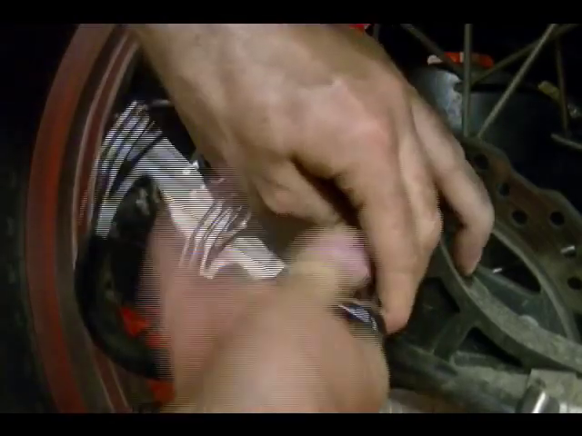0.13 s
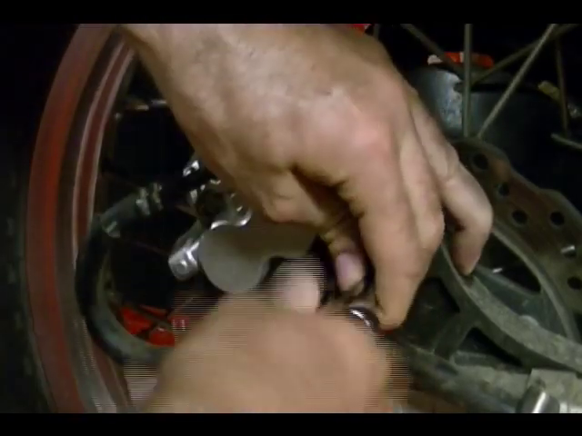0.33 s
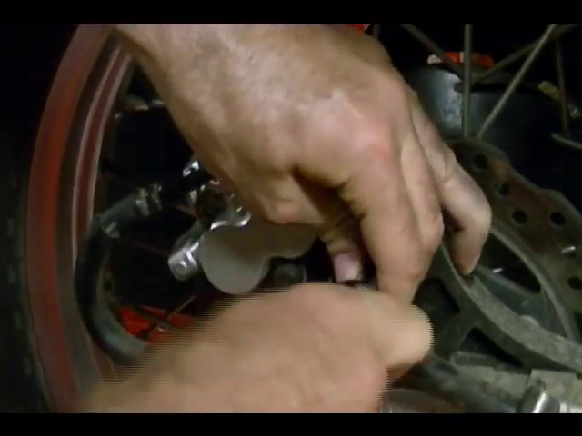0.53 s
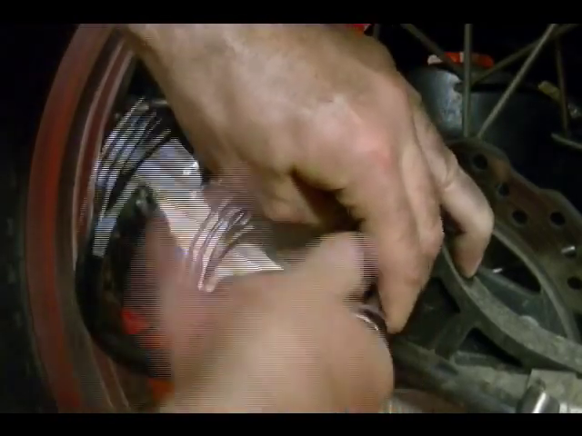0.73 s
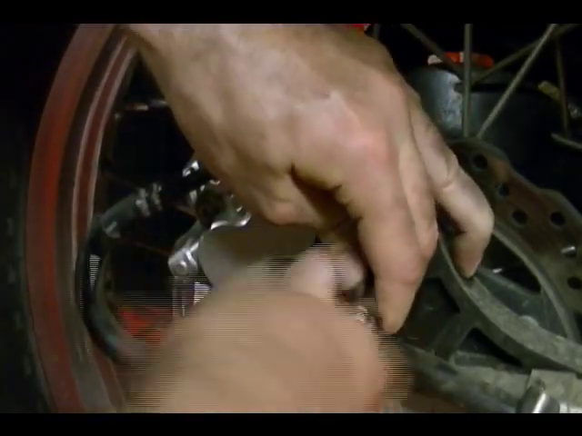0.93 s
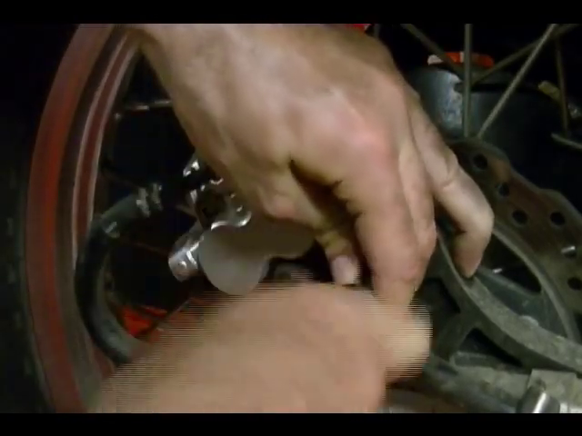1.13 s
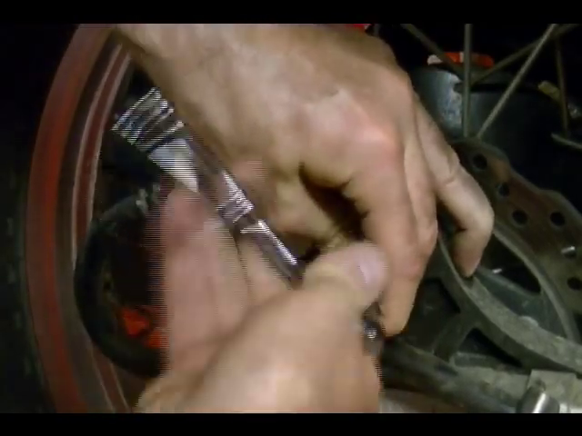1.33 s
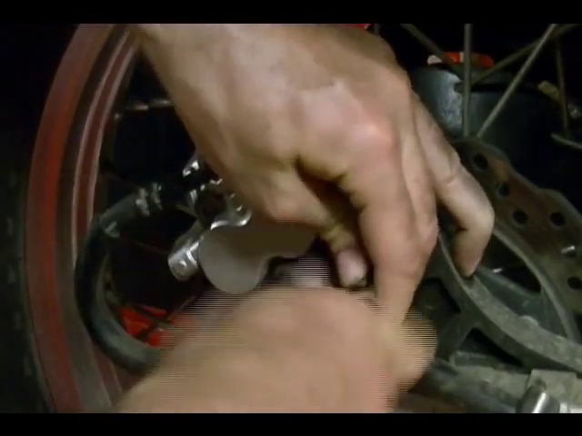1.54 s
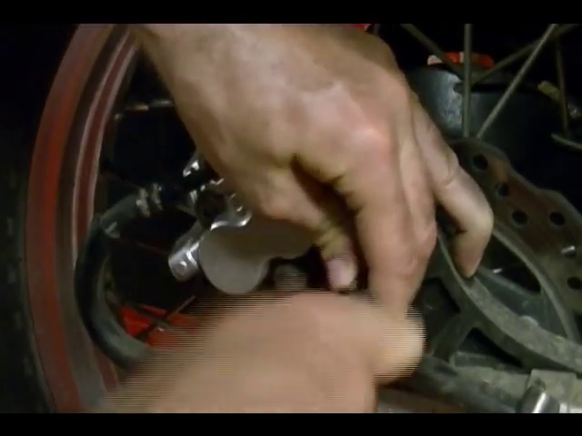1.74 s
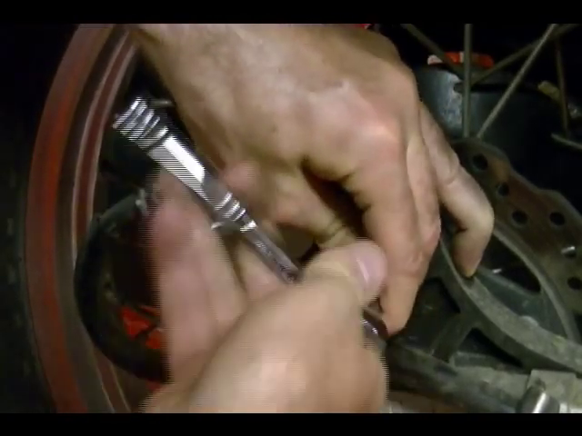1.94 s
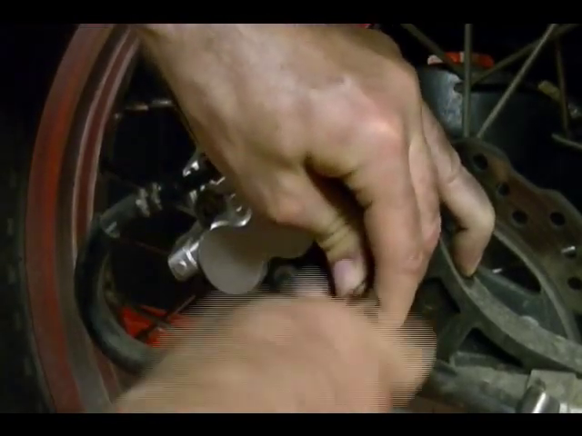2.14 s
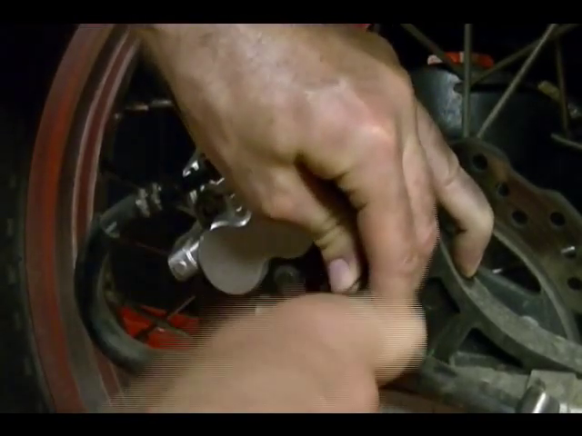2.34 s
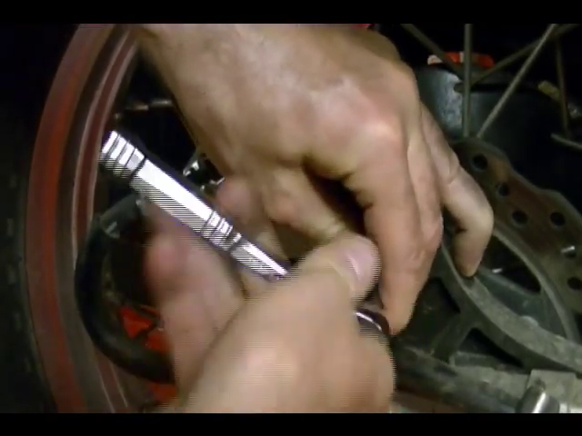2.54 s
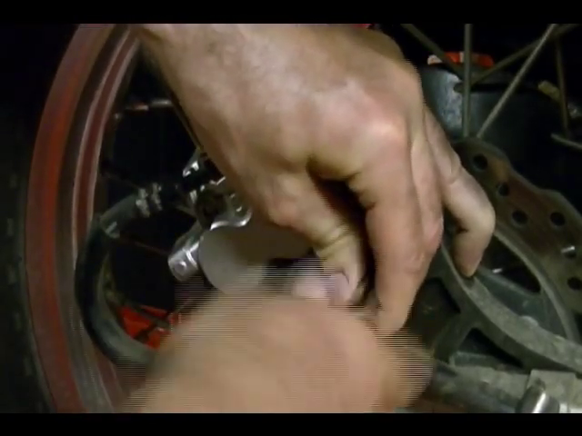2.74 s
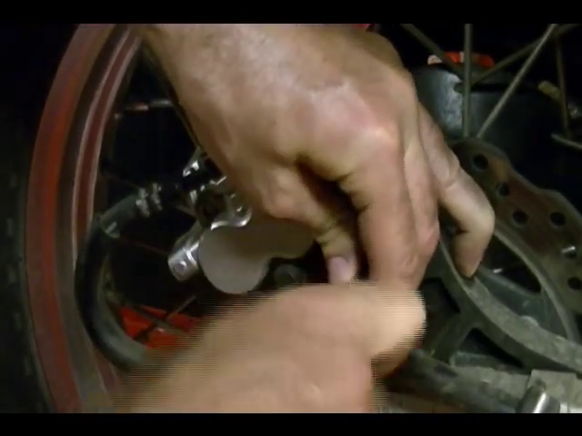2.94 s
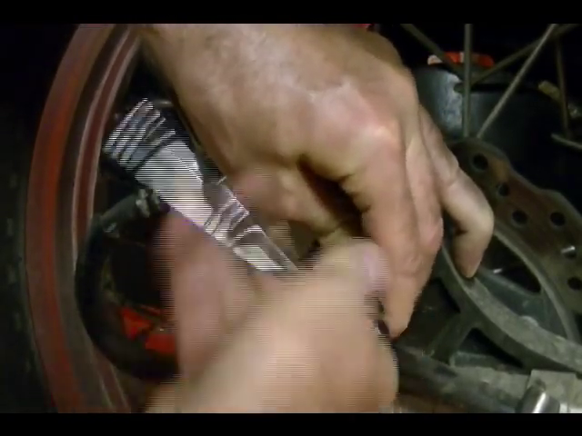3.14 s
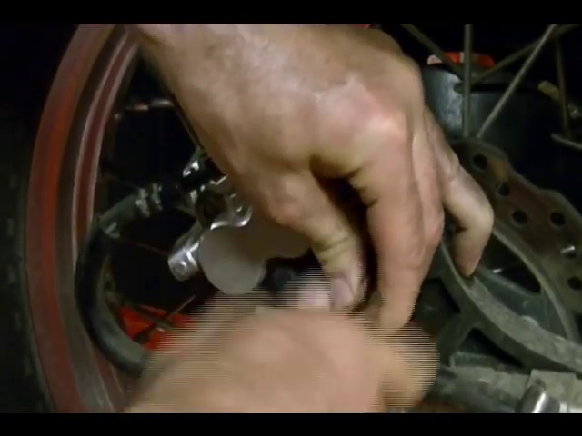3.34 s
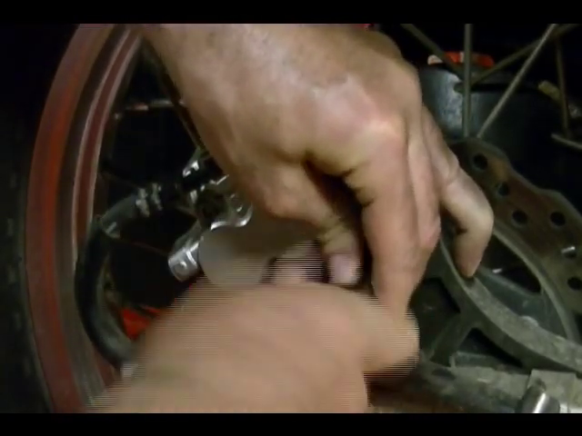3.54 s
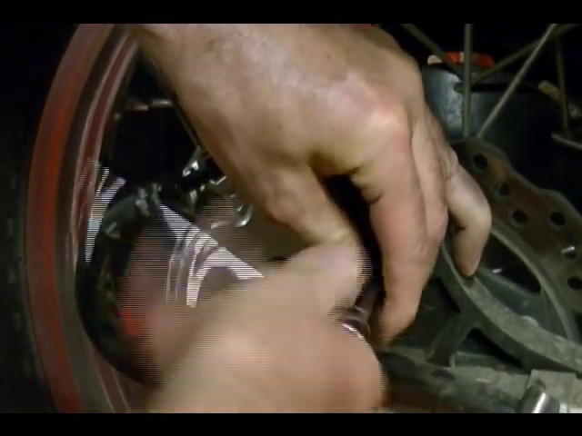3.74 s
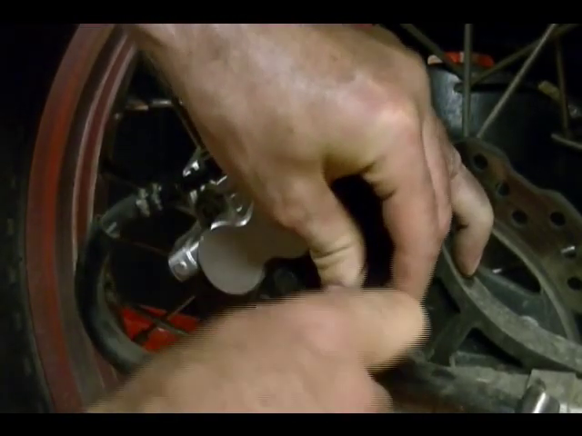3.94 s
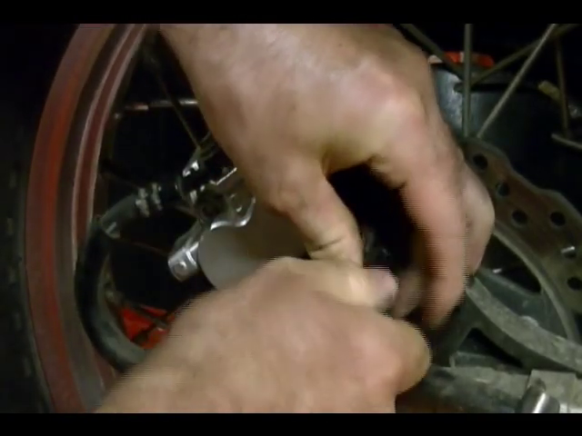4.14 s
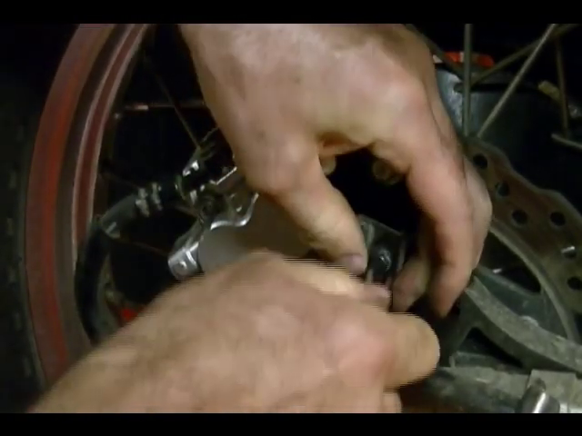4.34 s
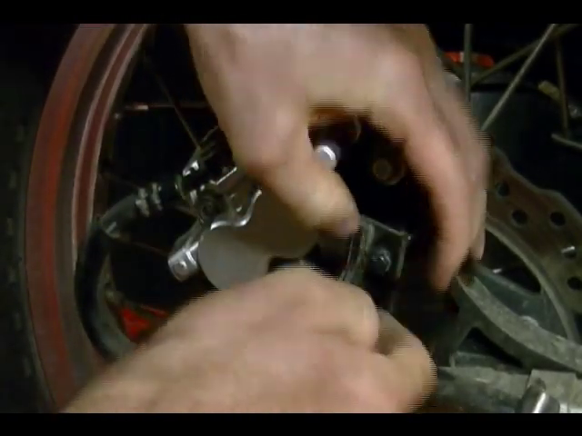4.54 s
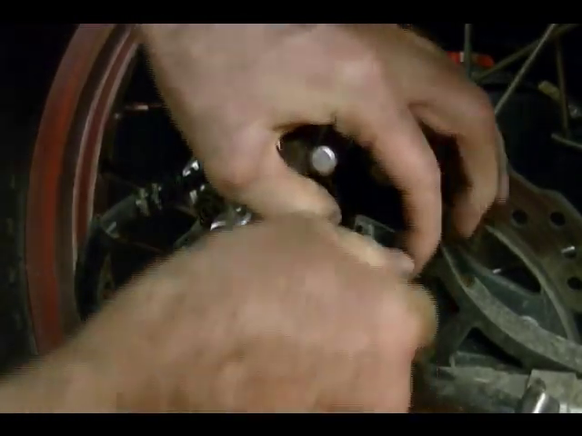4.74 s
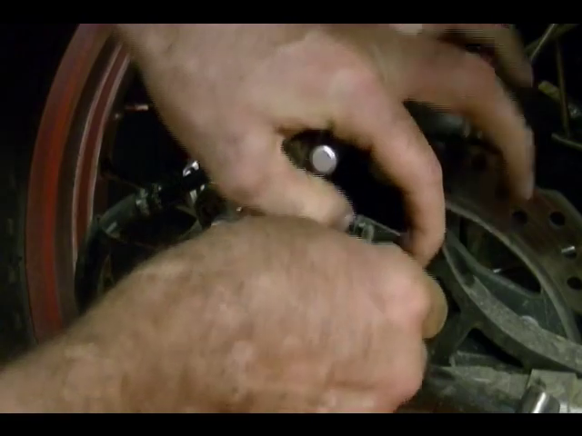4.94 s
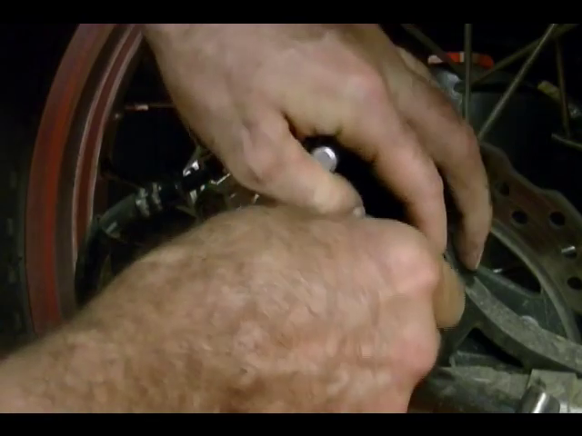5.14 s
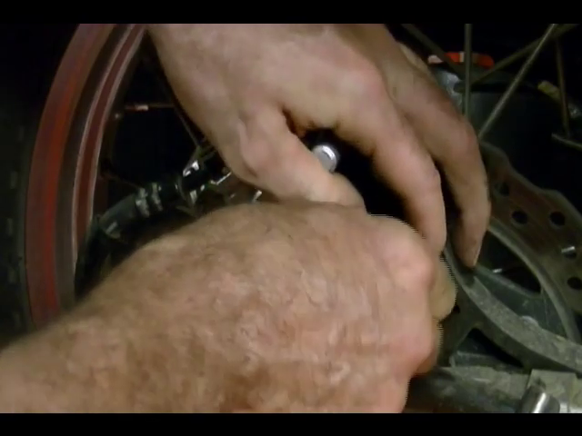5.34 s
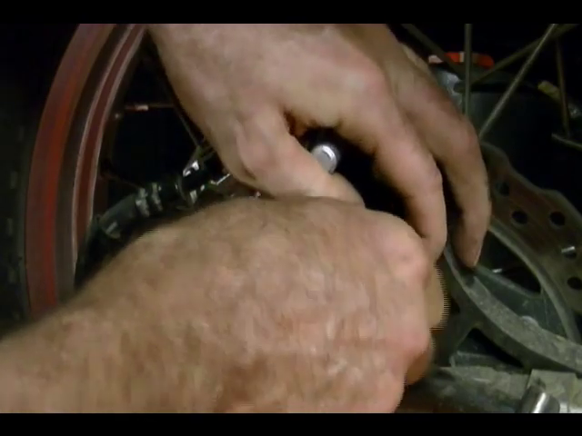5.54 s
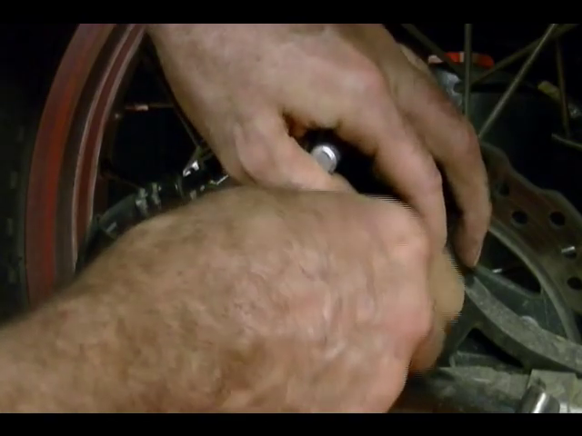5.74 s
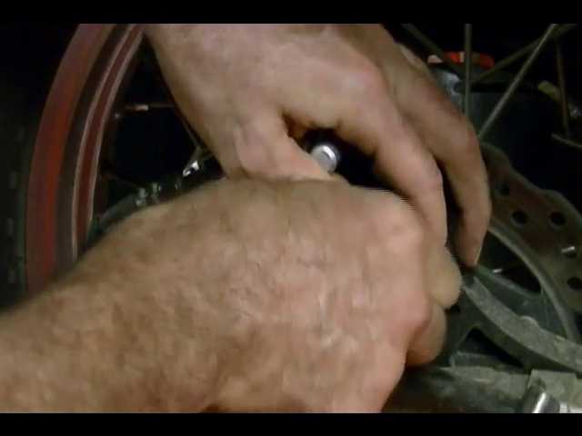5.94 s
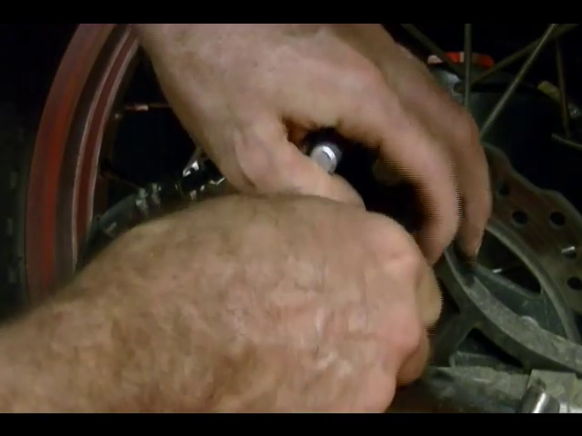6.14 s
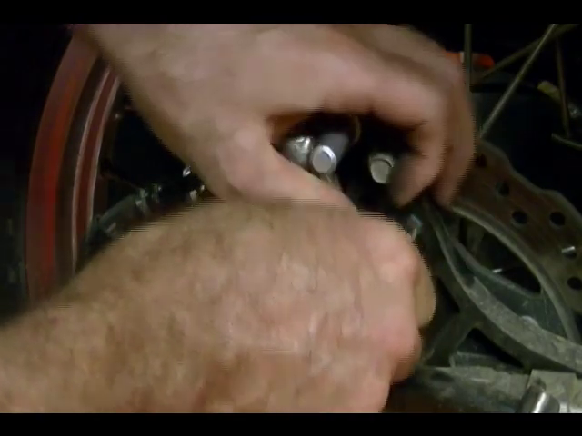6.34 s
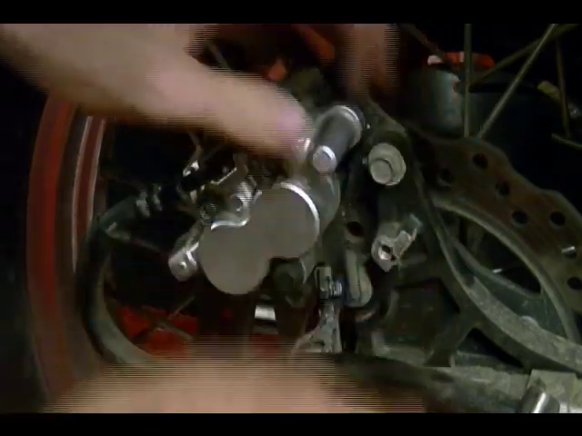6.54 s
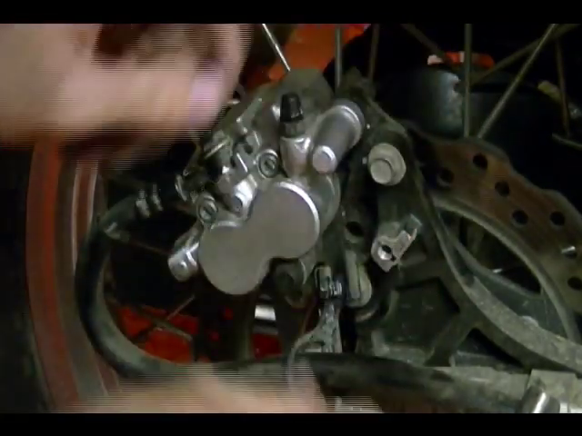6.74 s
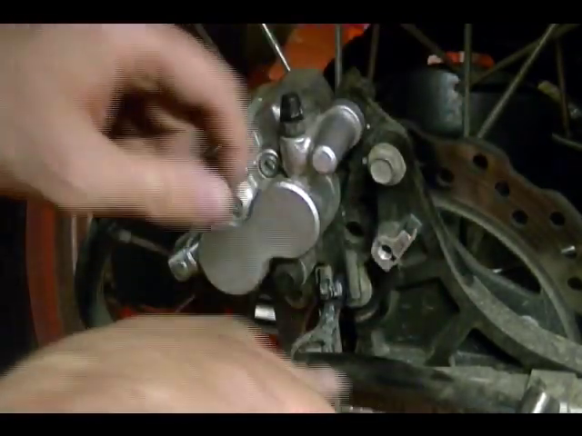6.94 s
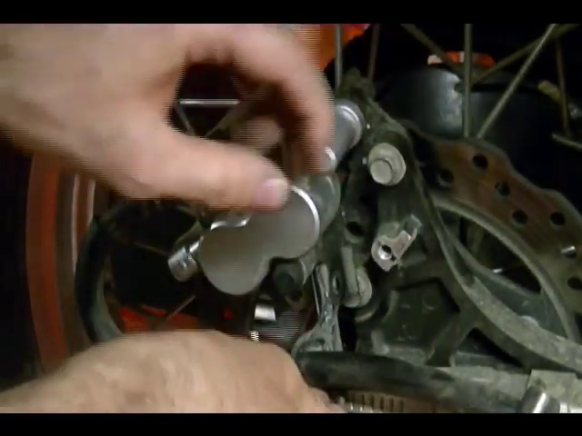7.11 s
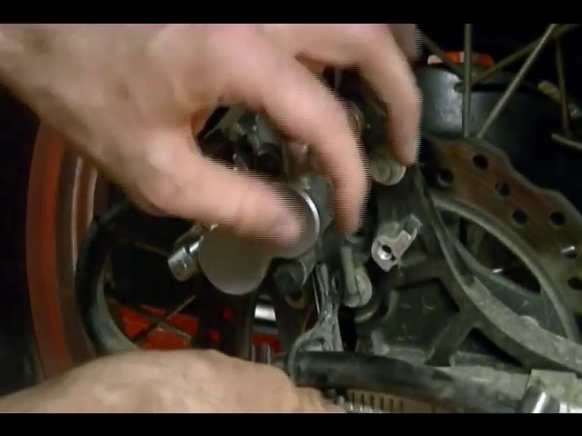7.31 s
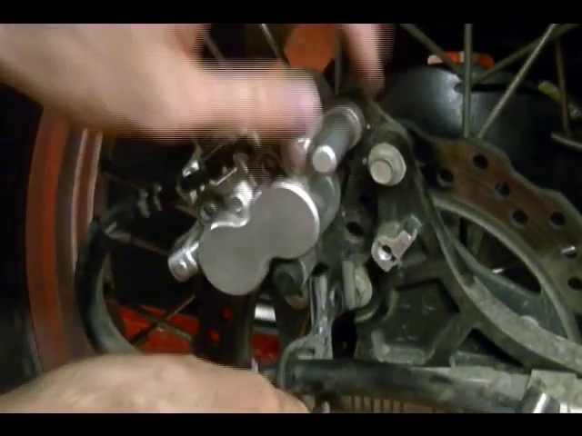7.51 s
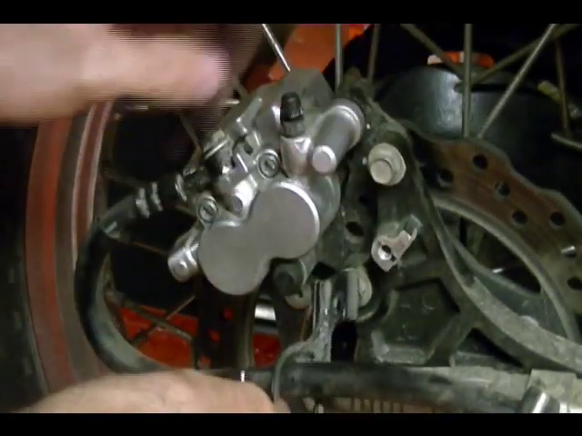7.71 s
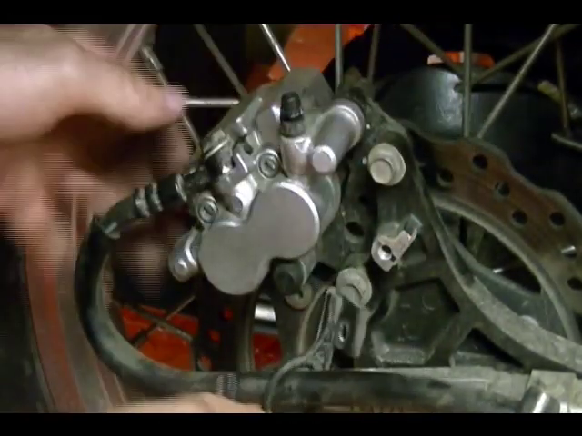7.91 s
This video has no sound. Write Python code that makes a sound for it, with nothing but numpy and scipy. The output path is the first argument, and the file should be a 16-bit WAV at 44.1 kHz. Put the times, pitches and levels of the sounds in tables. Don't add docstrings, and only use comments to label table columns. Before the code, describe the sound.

A garage heard close through a small microphone, with steady low hiss, soft rumble and a very faint lamp hum. From 0 to 0.2 s a few slow ratchet clicks; from about 0.35 to 3.8 s the hand ratchet makes fast zipping bursts of bright steel teeth, each around a tenth of a second, roughly every 0.3 s and slightly firmer with time. Dull knocks, short steel ringing and soft hollow bumps lie beneath. Separate slower clicks end by 4.6 s. From 4.7 to 6 s, sparse quiet finger ticks, strongest near 5.95. At 6.17-6.28 s the bolt comes free with a clunk and hard chink. Light touches at 6.9 lead to brighter ringing chinks at 7.0-7.15. At 7.46 s a part hits concrete loudly, bounces irregularly until 7.8 with gritty skitter and echo, then scrapes to rest around 8 s.

```python
import sys
import numpy as np
from scipy import signal
from scipy.fft import rfft, irfft, next_fast_len
from scipy.io import wavfile
from scipy.ndimage import uniform_filter1d

SR = 44100
rng = np.random.default_rng(int(sys.argv[2]) if len(sys.argv) > 2 else 0)


def dump(signal):
    limited = np.clip(np.atleast_2d(signal).T, -1, 1)
    pcm = np.round(limited * 32767).astype(np.int16)
    wavfile.write(sys.argv[1], SR, pcm)


def rack_gain(trim_db):
    fader = np.asarray(trim_db, float)
    return 10 ** (fader / 20)


N = 355887


def evened(x):
    return x / np.sqrt(np.mean(x ** 2) + 1e-20)


def read(points, hz):
    f, value = np.transpose(points)
    return np.interp(np.log(hz + 1), np.log(f + 1), value)


def level(rows):
    s, db = np.transpose(rows)
    return rack_gain(np.interp(np.arange(N) / SR, s, db, left=-120, right=-120))


def colour(x, points):
    size = next_fast_len(len(x))
    gain = rack_gain(read(points, np.fft.rfftfreq(size, 1 / SR)))
    return irfft(rfft(x, size) * gain, size)[:len(x)]


def add(mix, s, sound):
    part = mix[round(s * SR):][:len(sound)]
    part += sound[:len(part)]


def bursts(times, dbs, spectrum, rise, t60):
    t = np.arange(SR // 5) / SR
    power = np.zeros(N)
    attack = np.sin(np.pi / 2 * np.minimum(t / rise, 1)) ** 2
    puff = attack * rack_gain(-60 * np.maximum(t - rise, 0) / t60)
    for s, db in zip(times, dbs):
        add(power, max(s - rise / 2, 0), (rack_gain(db) * puff) ** 2)
    return np.sqrt(power) * evened(colour(rng.standard_normal(N), spectrum))


def rings(hz, db, t60, spread_db, detune, rise, lasts=1):
    t = np.arange(SR // 4)[:, None] / SR
    pitch_luck, phase_luck, height_luck = rng.standard_normal((3, len(hz)))
    tones = np.sin(2 * np.pi * (hz * (1 + detune * pitch_luck) * t + phase_luck))
    heights_db = db + spread_db * np.clip(height_luck, -1, 1)
    ring = (tones * rack_gain(heights_db - 60 * t / t60)).sum(1)
    attack = np.minimum(t[:, 0] / rise, 1) ** 2
    damping = np.clip((lasts - t[:, 0]) / 0.002 + 1, 0, 1)
    return ring * attack * damping


# (frequency [Hz], level [dB])
HISS = [(20, -40), (50, -22), (85, -1), (330, -10), (900, -11.5), (2000, -17), (11300, -28.5), (16500, -41)]
# (frequency [Hz], level [dB])
HUM = [(360.7, -70), (479.1, -64), (640.6, -75.5), (839.8, -71.5), (958.2, -66.5), (1561, -68.5),
       (4630, -77.5)]


def room_tone():
    hiss_db = -52
    t = np.arange(N) / SR
    swell = evened(uniform_filter1d(rng.standard_normal(N), 6000))
    out = rack_gain(hiss_db - 2.5 + 0.18 * swell) * evened(colour(rng.standard_normal(N), HISS))
    for hz, db in HUM:
        waver = evened(uniform_filter1d(rng.standard_normal(N), 3000))
        tone = np.sin(2 * np.pi * (hz * t + rng.random()) + .5 * waver)
        out += np.sqrt(2) * rack_gain(db + 2.4 * waver) * tone
    return out


# (start [s], length [s], gaps between teeth [count], extra slowness at the start [ratio], at the end [ratio])
RUNS = [(0.3532, 0.0528, 7, 0.7, 0.4), (0.4191, 0.0359, 3, 0.6, 0.2), (0.6314, 0.0432, 3, 1.0, 0.2),
        (0.6819, 0.0523, 7, 0.0, 0.3), (0.9697, 0.0213, 2, 0.6, 0.4), (0.9968, 0.0605, 8, 0.6, 2.5),
        (1.2754, 0.1038, 16, 1.2, 1.0), (1.565, 0.0329, 4, 0.7, 0.0), (1.6055, 0.077, 12, 0.0, 0.5),
        (1.8746, 0.101, 15, 0.9, 1.0), (2.1628, 0.1034, 16, 0.7, 0.7), (2.4659, 0.1041, 15, 1.1, 1.2),
        (2.7534, 0.0362, 5, 0.6, 0.5), (2.8035, 0.0447, 7, 0.2, 0.8), (3.0493, 0.0165, 2, 0.5, 0.0),
        (3.079, 0.0576, 9, 1.2, 1.1), (3.3616, 0.0448, 6, 0.3, 0.4), (3.4224, 0.049, 6, 0.0, 0.9),
        (3.7508, 0.0349, 5, 0.0, 0.1)]
# (time [s], snap level [dB], extra knock [dB])
LONE = [(0.0082, -25, -1), (0.0403, -26, -3.5), (0.0861, -26, -1), (0.129, -23.5, -4), (0.164, -33.5, -6),
        (0.33, -32.5, 2), (0.4767, -39, 7.5), (0.4847, -31.5, 4.5), (0.7736, -28.5, -1), (1.0826, -31, 4.5),
        (1.4148, -31.5, 3), (1.703, -29.5, 3), (2.0122, -27, 0.1), (2.2858, -24.5, -5), (2.3002, -32, 5),
        (2.6068, -24.5, 3), (2.867, -22.5, 0), (3.153, -23.5, 4.5), (3.194, -32, 4.5), (3.3409, -28.5, -4),
        (3.525, -29.5, 2), (3.565, -34.5, 3), (4.0719, -25, -1), (4.1013, -25.5, -4.5), (4.132, -25, -7),
        (4.2846, -33, -1), (4.41, -22, -1.5), (4.4228, -25.5, -12), (4.6042, -38, -12)]
# (time [s], snap level [dB])
SLACK = [(0.61, -39), (0.8193, -44), (0.8557, -42), (0.9258, -43.5), (1.2563, -38), (1.4662, -48),
         (1.5475, -43.5), (1.8432, -42), (1.8538, -37), (2.145, -37.5), (2.3905, -49), (2.4497, -41),
         (2.4634, -25), (2.738, -40), (3.03, -39), (3.2232, -52), (3.5481, -51), (3.592, -43), (3.697, -38),
         (3.7407, -44), (3.8437, -41), (3.864, -37), (3.8978, -38), (4.024, -37), (4.0386, -39),
         (4.0446, -46), (4.3206, -49), (4.35, -56), (4.5834, -39.5), (4.599, -54)]
RUN_DB = -25.5


def teeth():
    firmer_db_per_s, scatter_db, jitter_s = 0.92, 1.5, 0.0003
    knock_db, knock_share, knock_scatter_db = -34.5, 0.5, 3
    times = []
    for start, length, gaps, slow_in, slow_out in RUNS:
        u = (np.arange(int(gaps)) + .5) / gaps
        gap = 1 + slow_in * (1 - u) ** 3 + slow_out * u ** 3
        times += list(start + length * np.append(0, np.cumsum(gap)) / gap.sum())
    time_luck, snap_luck, knock_luck = np.clip(rng.standard_normal((3, len(times))), -2, 2)
    s = times + jitter_s * time_luck
    snap_db = RUN_DB + firmer_db_per_s * s + scatter_db * snap_luck
    runs = np.transpose([s, snap_db, knock_scatter_db * knock_luck])
    slack = [(*row, 0) for row in SLACK]
    s, snap_db, extra_db = np.vstack([runs, LONE, slack]).T
    return s, snap_db, knock_db + knock_share * (snap_db - RUN_DB) + extra_db


# (frequency [Hz], level [dB])
SNAP = [(2500, -23), (3800, -6.5), (5200, 0.5), (6200, 0.5), (7500, -1), (10000, -12), (13000, -15),
        (15800, -24)]
# (frequency [Hz], level [dB])
SPARK = [(6500, -25), (8500, -1), (11600, 1.5), (13000, -6.5), (15800, -11.5)]
# (frequency [Hz], level [dB])
KNOCK = [(150, -33), (500, -38), (900, -13.5), (1700, 3), (2400, 3.5), (3200, 0), (4500, -42)]
# (frequency [Hz], level [dB])
BODY = [(150, -55), (310, -14), (370, -3), (430, -8), (500, 0), (600, -14), (1000, -13), (2600, -50)]
# (frequency [Hz], level [dB], t60 [s])
RATCHET = [(4580, -17, .022), (5500, -9, .02), (6050, -5, .03), (6200, -2, .04), (6400, -6, .026),
           (7480, -12, .018), (8500, -11, .018), (11450, -5, .025), (11680, -5, .025), (13780, -10, .022),
           (14850, -10, .02)]
# (frequency [Hz], level [dB], t60 [s])
HANDLE = [(4620, -32, .12), (6085, -20, .18), (6175, -17, .18), (6270, -20, .13), (11490, -21, .14),
          (11570, -18, .16), (11650, -18, .16)]


def ratchet():
    ring_loss = 0.13
    struck_db = 3.5
    linger_db = -9
    s, snap_db, knock_db = teeth()
    tilt_db = 2.5 * np.clip(rng.standard_normal(len(s)), -1.5, 1.5)
    ring_db = snap_db + ring_loss * np.minimum(snap_db - RUN_DB, 0)
    out = bursts(s, snap_db - 2.5 - tilt_db / 2, SNAP, rise=.0015, t60=.022)
    out += bursts(s, ring_db - 5.5 + tilt_db, SPARK, rise=.0012, t60=.02)
    out += bursts(s, knock_db - 4.5, KNOCK, rise=0.0063, t60=0.057)
    out += bursts(s, snap_db - 25, BODY, rise=0.0082, t60=0.09)
    for at, db in zip(s, ring_db):
        steel = rings(*np.transpose(RATCHET), spread_db=struck_db, detune=0.0089, rise=0.001)
        handle = rings(*np.transpose(HANDLE), spread_db=struck_db, detune=0.0067, rise=0.0016)
        add(out, at - .0005, rack_gain(db - 0.5) * steel)
        add(out, at, rack_gain(db + linger_db) * handle)
    return out


# (time [s], level [dB])
GRIP = [(0.229, -54), (0.684, -53), (0.855, -45), (1.335, -40.5), (1.456, -47), (1.843, -46.5), (2.17, -48),
        (2.243, -40.5), (2.461, -44.5), (2.741, -47), (2.961, -51), (3.222, -49), (3.394, -46),
        (3.566, -48.5), (3.839, -50.5), (3.9, -49), (4.077, -50)]


def grip():
    s, db = np.transpose(GRIP)
    return bursts(s, db + 5.0, BODY, rise=0.0029, t60=0.12)


# (time [s], snap level [dB], knock over snap [dB], hollow thud over snap [dB])
TICKS = [(4.7046, -43, -10, -9), (4.903, -41.5, -13, -18), (4.976, -41, -17, -7), (5.1167, -47.5, 2, 9),
         (5.263, -48, 13.5, 13), (5.3642, -43, 2, -10), (5.5493, -44, 2, -12), (5.63, -32, -1.5, -14),
         (5.6763, -34.5, 5, 1), (5.829, -41.5, 2, -4), (5.9633, -25.5, -2.5, -10.5),
         (6.8753, -31.5, -25, -21), (6.8854, -37, -25, -15)]
# (frequency [Hz], level [dB])
TICK = [(2500, -25), (3800, -7), (5200, 4), (7500, -1.5), (11000, -12), (15800, -19)]


def fingers():
    s, snap_db, knock_db, thud_db = np.transpose(TICKS)
    hollow = [(150, -40), (450, -1.0), (900, -2), (1800, -37)]  # (frequency [Hz], level [dB])
    snaps = bursts(s, snap_db - 8.5, TICK, rise=0.00023, t60=0.035)
    thuds = bursts(s, snap_db + thud_db - 5.5, hollow, rise=0.00073, t60=0.031)
    knocks = bursts(s, snap_db + knock_db - 9, KNOCK, rise=0.00041, t60=0.051)
    return snaps + knocks + thuds


# (time [s], crack level [dB], clunk over crack [dB], bracket ring [dB], bolt ring [dB])
FREED = [
    (6.1716, -26, -14, -47, -48),
    (6.1864, -32.5, 1.5, -37, -44),
    (6.203, -25, -17, -44, -37),
    (6.217, -33, 6, -42, -33.5),
    (6.2525, -11.5, -1, -27, -37),
    (6.2589, -18, -9, -35, -21.5),
    (6.2755, -24, -4, -54, -38),
]
# (time [s], crack level [dB], clunk over crack [dB], bracket ring [dB], bolt ring [dB])
LAID = [
    (6.903, -36, -12, -33.5, -48),
    (7.015, -28, 0, -37, -40),
    (7.0294, -19.5, -11, -45.5, -35),
    (7.0417, -7.5, -12.5, -20.5, -22),
    (7.0973, -20, -9.5, -50, -21),
    (7.11, -30, -3, -50, -56),
    (7.139, -23.5, -14, -57, -27.5),
    (7.149, -42, -10, -64, -48),
]
# (frequency [Hz], level when freed [dB], level when laid down [dB], t60 [s], part [0 bracket, 1 bolt])
BOLT = [(730, -10, -30, .3, 0), (830, -12, -30, .25, 0), (1560, -11, -22, .2, 0), (2610, 0, -18, .075, 0),
        (3900, -16, -13, .06, 0), (4675, -19, -6, .06, 0), (7200, -6, -13, .12, 1),
        (7980, -14, -22, .08, 1), (8470, -3, -4, .17, 1), (8740, -8, -4, .15, 1), (11830, -16, -9, .14, 1),
        (13290, -6, -13, .12, 1)]
# (frequency [Hz], level [dB])
CRACK = [(90, -25), (300, -12), (2000, -6.5), (3500, -1.5), (5500, 0.5), (8000, 3), (11000, -8),
         (15500, -26)]
# (frequency [Hz], level [dB])
CLUNK = [(130, -55), (380, -9), (800, -2), (1500, 0), (2300, 1.5), (3200, -5), (5000, -25)]


def bolt():
    s, crack_db, clunk_db, *ring_db = np.transpose(FREED + LAID)
    hz, freed_db, laid_db, t60, group = np.transpose(BOLT)
    part = (group > .5).astype(int)
    out = bursts(s, crack_db - 13.5, CRACK, rise=0.0013, t60=0.044)
    out += bursts(s, crack_db + clunk_db - 7, CLUNK, rise=0.0011, t60=0.059)
    until_next = np.diff(s, append=N)
    for k, (at, lasts, dbs) in enumerate(zip(s, until_next, np.transpose(ring_db))):
        tones_db = freed_db if k < len(FREED) else laid_db
        db = tones_db + dbs[part] - 0.5
        add(out, at, rings(hz, db, t60, spread_db=0.5, detune=0.00085, rise=0.0016, lasts=lasts))
    return out


# (time [s], crack level [dB], clunk over crack [dB])
BOUNCES = [(7.457, -3.5, -12.5), (7.4643, -7.5, -32), (7.5534, -24, -12), (7.583, -2.5, -24),
           (7.638, -10, -10.5), (7.652, -30, -4.5), (7.692, -24, 5), (7.703, -8.5, -16),
           (7.7346, -30.5, -25), (7.76, -14.5, -9), (7.7828, -12, -11), (7.954, -45.5, 22)]
# (frequency [Hz], level [dB], t60 [s])
PANEL = [(394, -36.5, 0.61), (490, -44, 0.37), (770, -44, 0.3), (1480, -41, 0.3)]
# (time [s], level [dB])
SKITTER = [
    (7.47, -34),
    (7.6, -45),
    (7.78, -35),
    (7.92, -43.5),
    (7.96, -42.5),
    (8.07, -54),
]
# (frequency [Hz], level [dB])
SCRAPE = [(130, -40), (230, -11), (375, 1), (450, -7), (750, -4), (4600, -7), (9000, -17), (14000, -36)]


def drop():
    s, crack_db, clunk_db = np.transpose(BOUNCES)
    hits = bursts(s, crack_db - 6, CRACK, rise=0.00073, t60=0.017)
    hits += bursts(s, crack_db + clunk_db - 7.0, CLUNK, rise=0.00025, t60=0.013)
    add(hits, s[0], rings(*np.transpose(PANEL), spread_db=2.0, detune=0, rise=0.01, lasts=.24))
    bright, dull = np.zeros((2, N))
    at = np.round(s * SR).astype(int)
    bright[at] = rack_gain(crack_db + 17)
    dull[at] = rack_gain(crack_db + clunk_db + 20)
    blows = colour(bright, CRACK) + colour(dull, CLUNK)
    grain_gain = rack_gain(2.2 * np.minimum(rng.exponential(1, N), 4))
    grit = rng.standard_normal(N) * grain_gain * (rng.random(N) < 5000 / SR)
    skitter = rack_gain(-5.5) * level(SKITTER) * evened(colour(grit, SCRAPE))
    return hits, blows, skitter


# (frequency [Hz], t60 [s])
GARAGE = [(300, 1), (1500, 0.58), (4000, 0.5), (8000, 0.23), (15000, 0.23)]


def garage(x):
    taps = np.zeros(SR)
    at = np.arange(150, SR - 20, 20)
    taps[at + rng.integers(0, 20, len(at))] = rng.choice([-1., 1.], len(at))
    hz, t, z = signal.stft(taps, SR, nperseg=256)
    decay = rack_gain(-60 * t / read(GARAGE, hz)[:, None])
    tail = signal.istft(z * decay, SR, nperseg=256)[1]
    return signal.fftconvolve(x, tail / np.linalg.norm(tail))[:N]


def scene():
    tool, hands, chinks = ratchet(), fingers(), bolt()
    hits, blows, skitter = drop()
    wet = rack_gain(-11.5) * tool + rack_gain(-10.5) * hands + rack_gain(-12) * chinks + blows + rack_gain(2) * skitter
    near = tool + grip() + hands + chinks
    return (near + hits + skitter + garage(wet) + room_tone())[None]


def top_cut(x):
    return signal.sosfilt(signal.butter(12, 16970, fs=SR, output="sos"), x)


# (low edge [Hz], high edge [Hz])
EDGES_HZ = [30, 15900]


def record(dry):
    ceiling = 0.85
    creep = np.arange(N) * 4 / SR
    peak_db = np.maximum.accumulate(20 * np.log10(abs(dry[0]) + 1e-6) + creep) - creep
    over_db = np.clip(2 * (peak_db + 9), 0, 9)
    ducked = dry / rack_gain(uniform_filter1d(over_db, size=900, origin=449))
    rounded = ceiling * np.tanh(ducked / ceiling)
    low_cut = signal.butter(2, EDGES_HZ[0], "high", fs=SR, output="sos")
    high_cut = signal.firwin(511, EDGES_HZ[1], fs=SR)[None]
    mix = signal.oaconvolve(signal.sosfilt(low_cut, rounded), high_cut, "same")
    return top_cut(mix)


dry = scene()
out = record(dry)
dump(out)
```